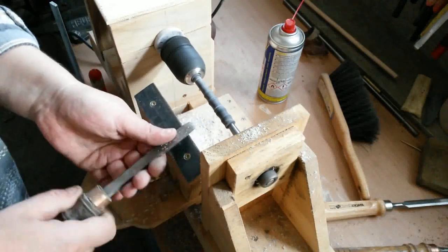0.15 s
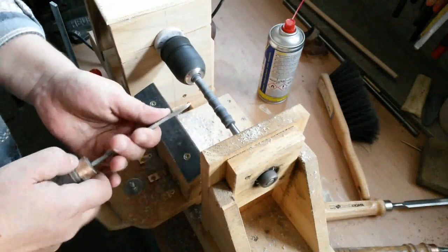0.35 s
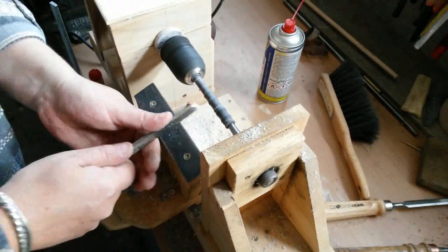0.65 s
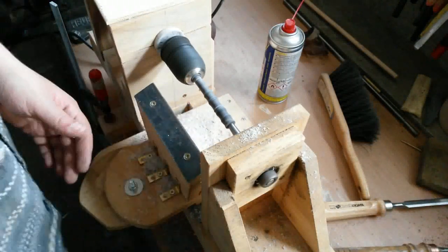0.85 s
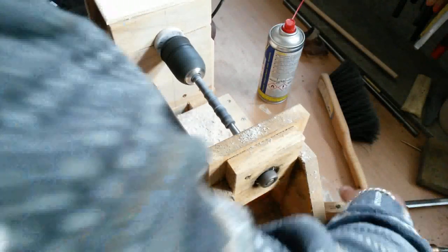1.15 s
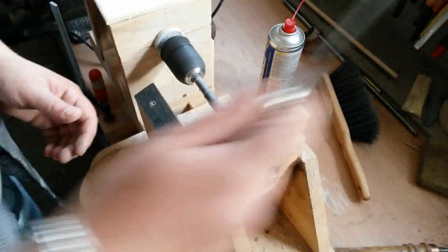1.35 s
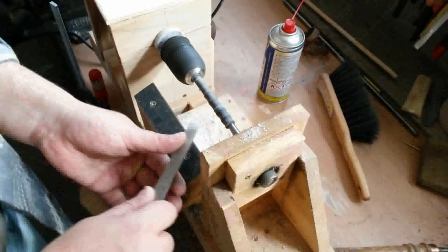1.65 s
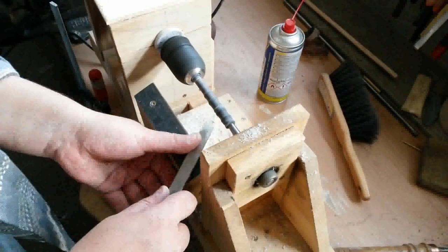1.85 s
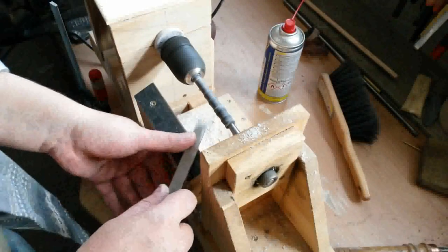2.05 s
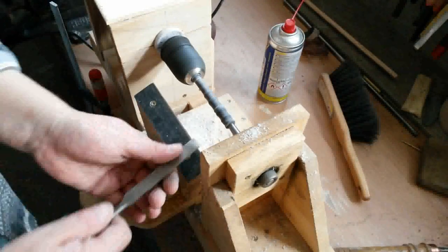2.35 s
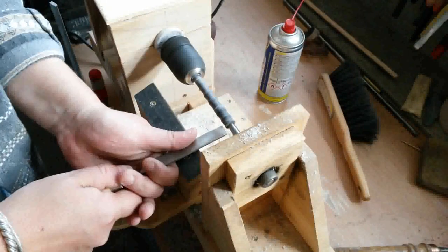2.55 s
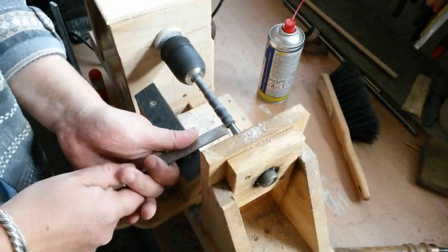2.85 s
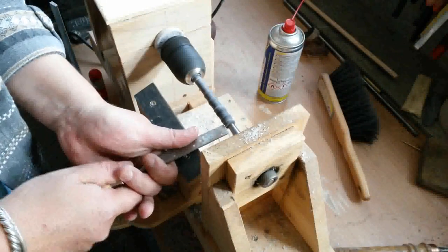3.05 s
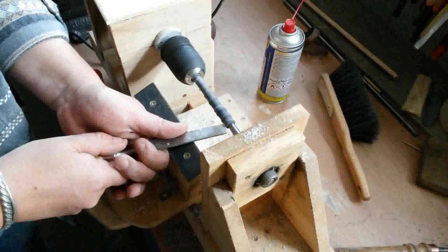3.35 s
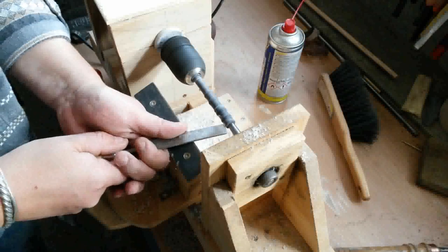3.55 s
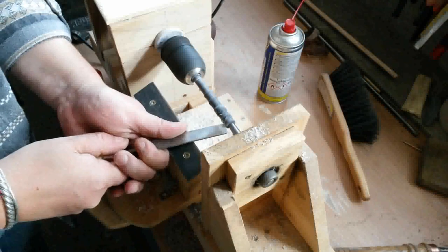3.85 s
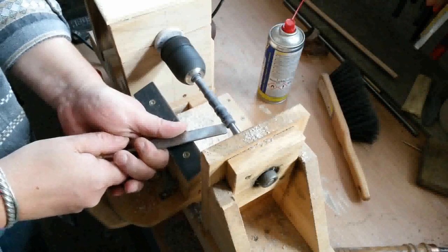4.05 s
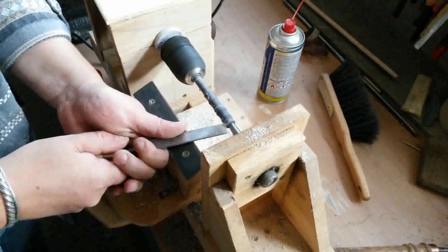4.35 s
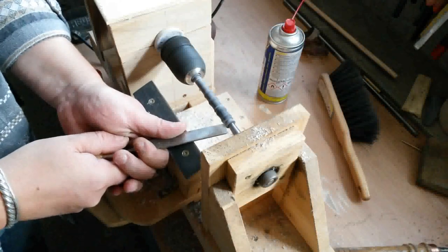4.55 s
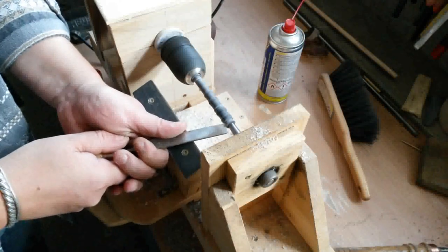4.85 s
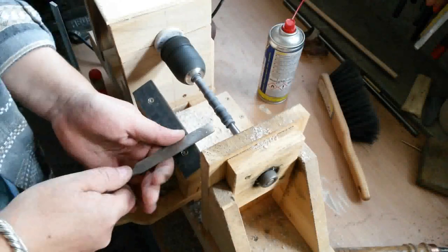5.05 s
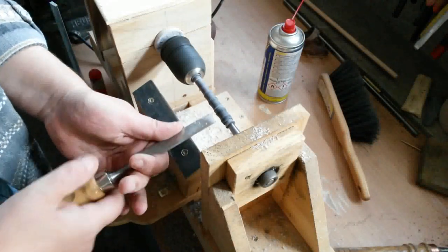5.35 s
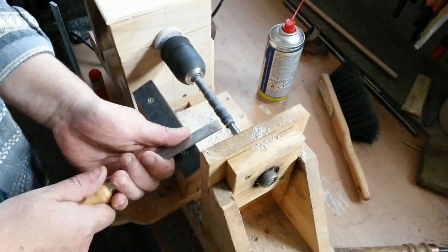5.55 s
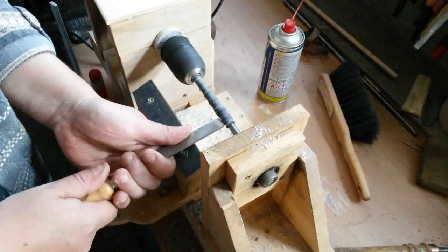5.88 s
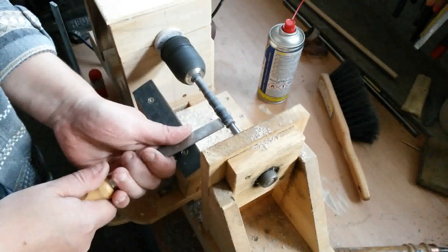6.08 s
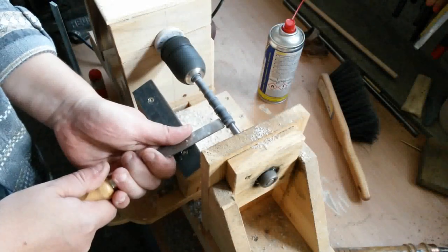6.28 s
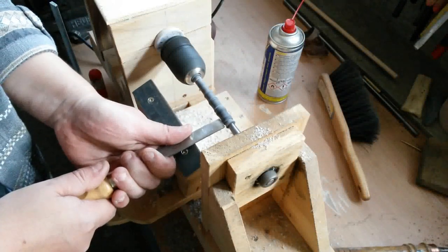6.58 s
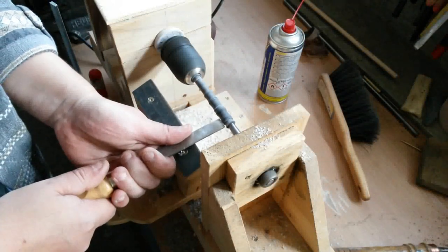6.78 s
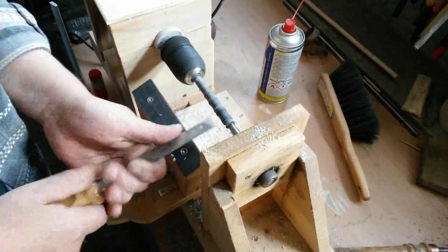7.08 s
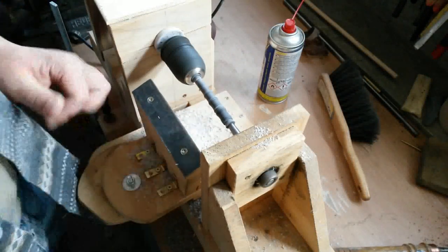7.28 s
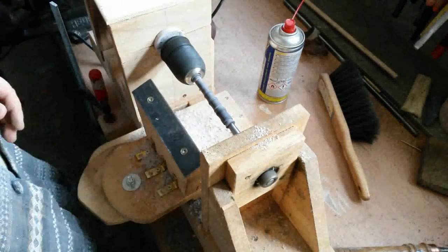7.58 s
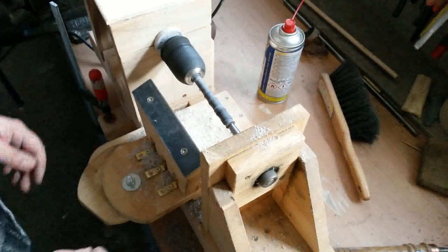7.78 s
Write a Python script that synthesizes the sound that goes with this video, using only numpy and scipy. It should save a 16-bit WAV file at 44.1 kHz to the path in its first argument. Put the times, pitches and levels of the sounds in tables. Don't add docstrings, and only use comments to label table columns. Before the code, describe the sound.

Close stereo sound of a small drill running continuously in a wooden jig, a thin high gear whine over fan and brush hiss and faint bench hum. The case buzzes harder briefly near the start. A file then scrapes the spinning rod in a short touch and two long strokes, pauses, and scrapes twice more with a duller, ringing tone. The drill recovers and keeps running.

```python
import sys
import numpy as np
from scipy import signal
from scipy.fft import rfft, irfft
from scipy.io import wavfile
from scipy.ndimage import uniform_filter1d

SR = 44100
rng = np.random.default_rng(int(sys.argv[2]) if len(sys.argv) > 2 else 0)


def boost_factor(decibels):
    exponent = np.asarray(decibels, float) / 20
    return 10 ** exponent


def generate_wav(sig):
    pcm = np.round(np.clip(np.atleast_2d(sig).T, -1, 1) * 32767).astype(np.int16)
    wavfile.write(sys.argv[1], SR, pcm)


N = 349263
T = np.arange(N) / SR

# time in seconds, mesh frequency in Hz.
MESH_SPEED = [(0, 1581.6), (.32, 1600.5), (.6, 1607.8), (1.6, 1606.8), (2.08, 1599.9), (2.5, 1609.8),
              (2.72, 1608.7), (3.05, 1576.9), (3.37, 1604.8), (3.66, 1575.5), (4.9, 1575.5), (5.15, 1603),
              (5.6, 1613.3), (5.74, 1612.5), (5.92, 1598.6), (7.04, 1596.8), (7.28, 1610), (7.62, 1616.5)]
# time in seconds, change in dB.
GEAR_PLAY = [(0, -2), (.62, 1.5), (.96, -0.5), (1.28, .5), (2.08, -2), (2.6, 1), (4.2, 1), (4.9, -8),
             (5.15, 2.5), (5.6, 1), (7, 1.5), (7.6, 0.5)]
# multiple of the rotor speed, level in dB.
LOW_ORDERS = [(9.5, -24), (11.5, -19.5), (12.5, -25)]
# multiple of the rotor speed, level in dB.
HIGH_ORDERS = [(19, -17), (20, -11), (22, -12), (23, -15), (25, -13), (31.5, -13), (42, -17)]
# start in seconds, end in seconds, blade ring in dB,
# rasp over ring in dB, readiness of low bands to drop out.
STROKES = [
    (2.737, 3.112, -34.5, 2, 2.1),
    (3.422, 4.258, -37, 4, 2.42),
    (4.261, 4.936, -35, 3, 2.7),
    (5.775, 6.418, -35, 2, 0.87),
    (6.466, 7.095, -33.5, -1, 1.7),
]
# frequency in Hz, density in dB per Hz.
RASP_SPECTRUM = [(1060, -42), (1800, -15.5), (2160, -4.5), (2490, -18), (3060, -1.5), (4760, -15),
                 (8710, -3.5), (15500, -3)]
# frequency in Hz, width in Hz, height in dB.
RASP_MODES = [(4120, 800, 13), (4550, 67, 14), (7650, 280, 4), (9540, 300, 6.5)]
# frequency in Hz, width in Hz, level in dB.
BLADE_MODES = [(8480, 480, -1), (8760, 480, 0), (11550, 340, -6)]
# frequency in Hz, left-right likeness.
FILE_LIKENESS = [(60, 0.44), (950, 0.96), (15000, 0.1)]
# frequency in Hz, density in dB per Hz.
HISS_SPECTRUM = [(120, -54), (200, -34.5), (554, -23), (596, -18), (653, -18), (1380, -16), (1560, -10),
                 (1840, -10), (2330, -11), (3120, -4.5), (4030, -7.5), (10000, -9), (15500, -14)]
# frequency in Hz, width in Hz, height in dB.
HOUSING_MODES = [(2707, 160, 7.5), (3627, 85, 5.5), (6030, 340, 3), (7760, 510, -0.5), (8720, 340, 2.5)]
# frequency in Hz, left-right likeness.
MOTOR_LIKENESS = [(60, 1), (150, 0.98), (380, 0.86), (950, 0.81), (2380, 0.71), (5980, 0.38), (15000, 0.51)]
# frequency in Hz, level in dB.
BENCH_HUM = [(306.8, -66), (393.0, -63), (452.2, -62), (602.9, -47), (786.0, -55), (1055, -56)]
# frequency in Hz, left minus right in dB.
CHANNEL_LEAN = [(60, 1), (380, 1.0), (2380, -0.5), (15000, 1)]
LOW_BAND_EDGES = (170, 260, 345, 470, 620, 790, 960, 1130, 1380)
# frequency in Hz, readiness of a low band to drop out.
DROP_READINESS = [(130, 1.3), (215, 1.2), (300, .6), (345, .35), (430, -.2), (500, -2.1), (900, -2.2),
                  (1300, -2.1)]
# frequency in Hz, depth of a dropped band in dB.
DROP_DEPTH = [(100, -8), (215, -14), (300, -22), (390, -24), (500, -32), (1300, -32)]
# start in seconds, length in seconds.
LONG_GAPS = [(2.95, 0.046), (3.604, 0.024), (3.81, 0.044), (3.996, 0.038), (4.122, 0.034), (4.297, 0.056),
             (4.36, 0.036), (4.535, 0.021), (4.653, 0.052), (4.725, 0.044), (4.795, 0.0413), (4.898, 0.02),
             (6.193, 0.036), (6.289, 0.021), (6.345, 0.04), (6.637, 0.046), (6.693, 0.024), (6.785, 0.039),
             (6.925, 0.062)]
# frequency in Hz, swell of a surviving low band in dB.
SURVIVOR_SWELL = [(130, 2.5), (215, 2.5), (300, 7), (390, 5), (500, 0)]
TOP_BAND_EDGES = tuple(range(10000, 16200, 260))

MESH_PER_TURN = 10.5
FREE_HZ, WARMING_HZ_PER_S = 1607, 1.3
MESH_DB, MESH_LOSS_DB, MESH_SAG_HZ = -27.5, -17.5, 42
MESH_CUT_DB, LOAD_S = -5, 0.075
OCTAVE_DB, OCTAVE_LOSS_DB = -29.5, -2.5
HISS_DB, HUM_DB, HUM_LOSS_DB = -23, 0.5, -0.5
BRIGHT_DB, BRIGHT_CUT_DB, CASE_DB, CASE_CUT_DB = -0.6, 0.6, 1.5, -2
SHAKE_S, SHAKE_LENGTH_S, SHAKE_DB = 0.84, 0.6, 3
TOUCH_S, UNEVEN_DB, BITES_PER_S, BITE_DECAY_S = 0.016, 1.8, 900, 0.00038
TURNED_S, TURNED_DULL_DB, TURNED_TOP_DB = 5.4, -2.5, 6
DUCK_DB, DUCK_S, LIFT_SHARE, HOLD_S, RECOVER_S = -9, 0.056, 0.35, 0.16, 0.13
START_DB, START_S = -4, 0.16


def drill():
    mesh_hz = uniform_filter1d(np.interp(T, *np.transpose(MESH_SPEED)), size=SR // 8)
    sag_hz = np.maximum(FREE_HZ + WARMING_HZ_PER_S * T - mesh_hz, 0)
    strain = 1 - np.exp(-sag_hz / MESH_SAG_HZ)
    turns = np.cumsum(mesh_hz) / SR / MESH_PER_TURN
    gain_db = ducking()
    cut = uniform_filter1d(1. * cutting(T), size=4000)
    hiss_db = HISS_DB + gain_db
    whine = gear_whine(turns, strain, gain_db, hiss_db, cut)
    return whine + fan_hiss(turns, hiss_db, cut) + bench_hum(strain, gain_db), turns


def gear_whine(turns, strain, gain_db, hiss_db, cut):
    ease = np.exp(-1 / (LOAD_S * SR))
    load = signal.lfilter([1 - ease], [1, -ease], cut)
    mesh_db = MESH_DB + gain_db + MESH_LOSS_DB * strain
    mesh_db += np.interp(T, *np.transpose(GEAR_PLAY)) + MESH_CUT_DB * load
    octave_db = OCTAVE_DB + gain_db + OCTAVE_LOSS_DB * strain
    whine = tone(MESH_PER_TURN * turns, mesh_db, flutter_db=0.37, flutter_hz=60.2, spread=0.084)
    whine += tone(2 * MESH_PER_TURN * turns, octave_db, flutter_db=1.04, flutter_hz=61.0, spread=0.071)
    low_db = 0.64 * hiss_db + 0.4 * mesh_db
    high_db = octave_db - 4.0 * cut
    for orders, near_db in (LOW_ORDERS, low_db), (HIGH_ORDERS, high_db):
        for order, db in orders:
            whine += tone(order * turns, near_db + db, flutter_db=2.3, flutter_hz=59.2, spread=0.12)
    return whine


def file(turns):
    ring_level, rasp_level = np.zeros((2, N))
    for start, end, db, rasp_db, _ in STROKES:
        stroke = ramp(T, start - TOUCH_S / 2, TOUCH_S) - ramp(T, end - TOUCH_S / 2, TOUCH_S)
        ring_level += stroke * boost_factor(db)
        rasp_level += stroke * boost_factor(db + rasp_db)
    ring_level *= boost_factor(UNEVEN_DB * wander(11))
    rasp_level *= boost_factor(0.38 * wander(5.1))
    bite_size = boost_factor(1.7 * np.minimum(rng.exponential(1, N), 4))
    bites = bite_size * (rng.random(N) < BITES_PER_S / SR)
    bites = evened(signal.lfilter([1], [1, -np.exp(-1 / (BITE_DECAY_S * SR))], bites))
    pulse = 1 + (0.057 + 0.05 * wander(3.5)) * np.cos(2 * np.pi * turns)
    grip = (1 + 0.73 * bites) * pulse * boost_factor(0.41 * wander(40))
    turned = 1. * (T > TURNED_S)
    scrape = rng.standard_normal((2, N))
    scrape = (scrape + 0.61 * scrape[::-1]) * grip
    ring = 0
    for hz, width, db in BLADE_MODES:
        wake_db = (hz > 1e4) * TURNED_TOP_DB * (2 * turned - 2)
        ring = ring + boost_factor(db + wake_db) * peak(scrape, hz, width)
    dull_db = TURNED_DULL_DB * turned
    rasp = noise(RASP_SPECTRUM, RASP_MODES, FILE_LIKENESS, patchy_db=0.5, bright_db=dull_db) * grip
    return ring_level * evened(ring) + boost_factor(7.0) * rasp_level * evened(rasp)


def fan_hiss(turns, hiss_db, cut):
    bright_db = BRIGHT_DB + BRIGHT_CUT_DB * cut + 0.27 * wander(6)
    case_db = CASE_DB + CASE_CUT_DB * cut + 0.25 * wander(11)
    case_db += SHAKE_DB * np.sin(np.pi * ramp(T, SHAKE_S, SHAKE_LENGTH_S)) ** 0.5
    once = (0.045 + 0.035 * wander(5.8)) * np.cos(2 * np.pi * turns)
    twice = (0.05 + 0.04 * wander(4)) * np.cos(4 * np.pi * turns + 0.7)
    hiss = noise(HISS_SPECTRUM, HOUSING_MODES, MOTOR_LIKENESS, 0.84, bright_db, case_db)
    return boost_factor(hiss_db + 4.0 + 0.84 * wander(25)) * hiss * (1 + once + twice)


def bench_hum(strain, gain_db):
    hum_db = HUM_DB + gain_db + HUM_LOSS_DB * strain
    return sum(tone(hz * T, db + hum_db, flutter_db=2.7, flutter_hz=30, spread=0.085) for hz, db in BENCH_HUM)


def tone(turns, db, flutter_db, flutter_hz, spread):
    phase = 2 * np.pi * (turns + rng.random()) + 0.092 * wander(flutter_hz)
    apart = spread * wander(1.4) * np.array([[1], [-1]])
    return np.sqrt(2) * boost_factor(db + flutter_db * wander(flutter_hz)) * np.sin(phase + apart)


def noise(spectrum, modes, likeness, patchy_db, bright_db=0 * T, case_db=0 * T):
    frames, hz = N // 128 + 5, np.fft.rfftfreq(512, 1 / SR)
    a, b, c, d, patches = rng.standard_normal((frames, 257, 5)).T
    patches = evened(uniform_filter1d(uniform_filter1d(patches, 10, 0), 24, 1))
    colour_db = read(spectrum, hz)
    for mode_hz, width, db in modes:
        colour_db = colour_db + db / (1 + (2 * (hz - mode_hz) / width) ** 2)
    like = np.clip(read(likeness, hz), -1, 1)[:, None]
    left = a + 1j * b
    right = like * left + np.sqrt(1 - like ** 2) * (c + 1j * d)
    top = np.clip(np.log2(hz / 4000 + 1e-3), 0, 1)[:, None]
    case = np.exp(-((hz - 3200) / 700) ** 2)[:, None]
    frame_s = np.arange(frames) * 128 / SR
    bright_db, case_db = np.interp(frame_s, T, bright_db), np.interp(frame_s, T, case_db)
    level_db = colour_db[:, None] + patchy_db * patches + top * bright_db + case * case_db
    z = np.array([left, right]) * boost_factor(level_db)
    return evened(signal.istft(z, nperseg=512, noverlap=384)[1][:, :N])


def peak(x, hz, width):
    b, a = signal.iirpeak(hz, hz / width, SR)
    return signal.lfilter(b, a, signal.lfilter(b, a, x))


def wander(top_hz):
    speeds, starts = np.geomspace(top_hz / 20, top_hz, 24), rng.random(24)
    coarse = T[::128, None]
    wave = (np.sin(2 * np.pi * (speeds * coarse + starts)) / np.sqrt(speeds)).sum(1)
    return evened(np.interp(T, coarse[:, 0], wave))


def evened(x):
    return x / np.sqrt(np.mean(x ** 2) + 1e-20)


def read(points, hz):
    f, value = np.transpose(points)
    return np.interp(np.log(hz + 1), np.log(f + 1), value)


def ramp(t, start, length):
    return np.clip((t - start) / length, 0, 1)


def cutting(t):
    return np.max([(t > start) & (t < end) for start, end, *_ in STROKES], axis=0)


def ducking():
    held = []
    for start, end, *_ in STROKES:
        lift = LIFT_SHARE * ramp(T, end, DUCK_S)
        recovery = (1 - LIFT_SHARE) * ramp(T, end + HOLD_S, RECOVER_S)
        held.append(ramp(T, start - DUCK_S / 3, DUCK_S) * (1 - lift - recovery))
    return DUCK_DB * np.max(held, axis=0) + START_DB * np.exp(-T / START_S)


def scene():
    drilling, turns = drill()
    return drilling + file(turns)


def below(x, hz):
    return signal.oaconvolve(x, signal.firwin(1023, hz, window=("kaiser", 8), fs=SR)[None], "same")


def drop_low_bands(x, swell_db=1.86, long_gap_db=-12):
    hz, t, z = signal.stft(x, SR, nperseg=512, noverlap=384)
    block = np.arange(len(t)) // 4
    pair = block // 2
    draw = rng.standard_normal((len(t), len(LOW_BAND_EDGES) + 3)).T
    shared = draw[-1, block]
    slow = 0.55 * evened(uniform_filter1d(draw[0], size=6))[pair] + 0.8 * draw[-2, pair]
    band = np.searchsorted(LOW_BAND_EDGES, hz)
    low, bass = (band < len(LOW_BAND_EDGES))[:, None], (band < 4)[:, None]
    cut = cutting(t)
    bass_luck = np.where(cut, shared, slow) + 0.33 * draw[band][:, pair]
    luck = np.where(bass, bass_luck, 0.55 * shared + 0.85 * draw[band][:, block])
    readiness = sum(r * ((t > start) & (t < end)) for start, end, _, _, r in STROKES)
    long_gap = sum((t > start) & (t < start + length) for start, length in LONG_GAPS)
    need = read(DROP_READINESS, hz)[:, None] + 0.9 * readiness - 1.4 * bass * cut + 2.0 * long_gap
    shut = np.clip((need - luck) / 0.1 + 0.5, 0, 1)
    depth_db = read(DROP_DEPTH, hz)[:, None] + long_gap_db * long_gap - 6.9 * bass * cut
    gain_db = depth_db * shut + swell_db * cut + read(SURVIVOR_SWELL, hz)[:, None]
    return signal.istft(z * boost_factor(low * gain_db), SR, nperseg=512, noverlap=384)[1][:, :N]


def speckle(x, share, depth_db):
    hz, t, z = signal.stft(x, SR, nperseg=1024)
    luck = rng.random((len(t) // 3 + 1, len(TOP_BAND_EDGES) + 1)).repeat(3, 0)[:len(t)].T
    band = np.searchsorted(TOP_BAND_EDGES, hz)
    chance = (band > 0)[:, None] * share * (0.12 + cutting(t))
    kept = boost_factor(depth_db * np.clip((chance - luck[band]) / 0.02, 0, 1))
    return signal.istft(z * kept, SR, nperseg=1024)[1][:, :N]


def low_pass(x):
    return signal.sosfilt(signal.butter(12, 16690, fs=SR, output="sos"), x)


def record(dry):
    lean = boost_factor(read(CHANNEL_LEAN, np.fft.rfftfreq(N, 1 / SR)) / 2)
    balanced = irfft(rfft(dry) * [lean, 1 / lean], N)
    gated = drop_low_bands(below(balanced, hz=15750))
    mix = speckle(gated, share=0.06, depth_db=-46)
    return low_pass(mix)


dry = scene()
out = record(dry)
generate_wav(out)
```